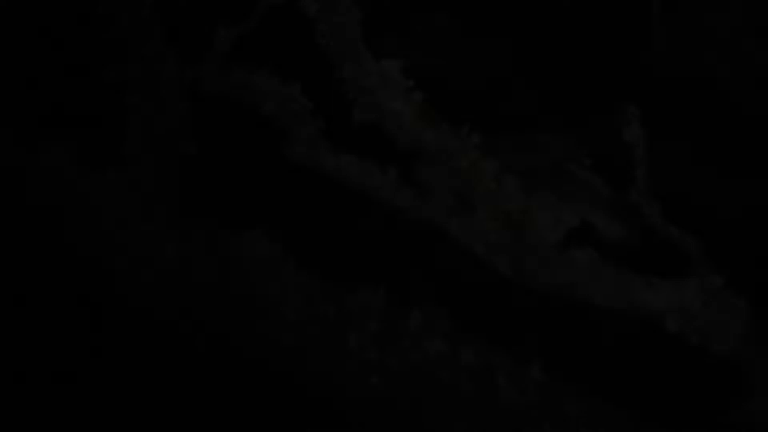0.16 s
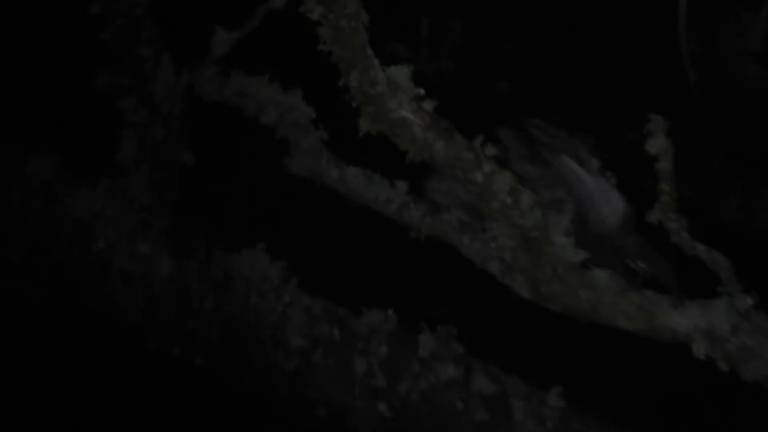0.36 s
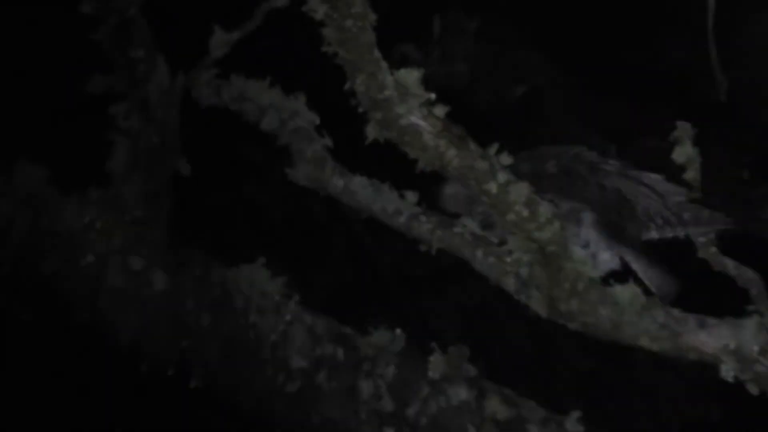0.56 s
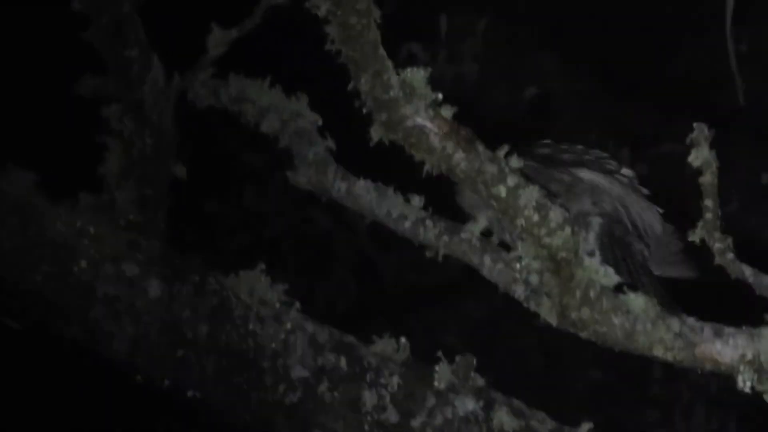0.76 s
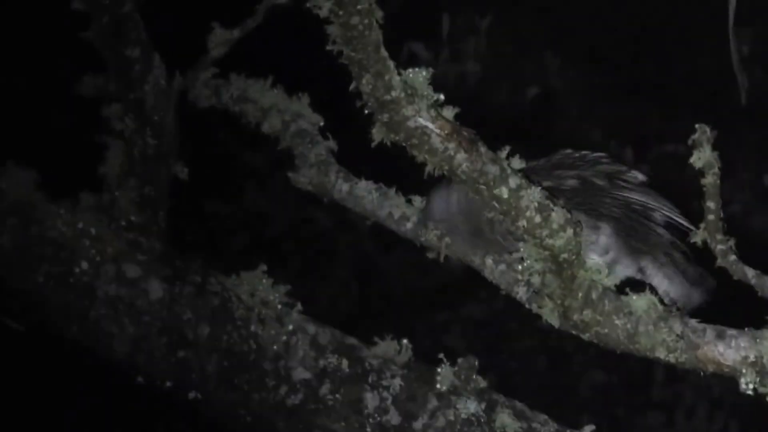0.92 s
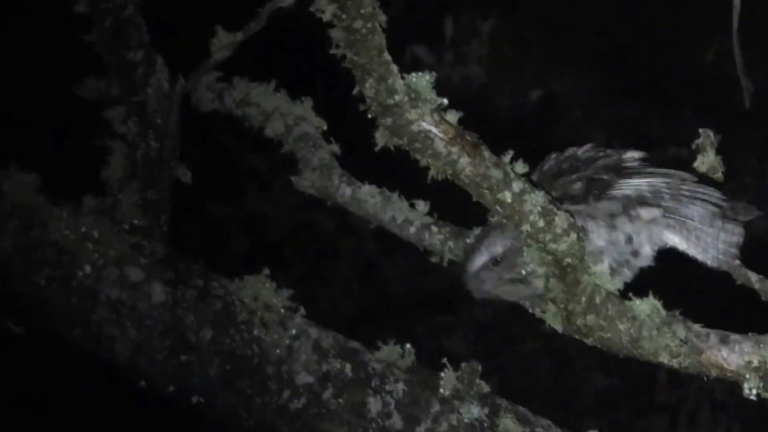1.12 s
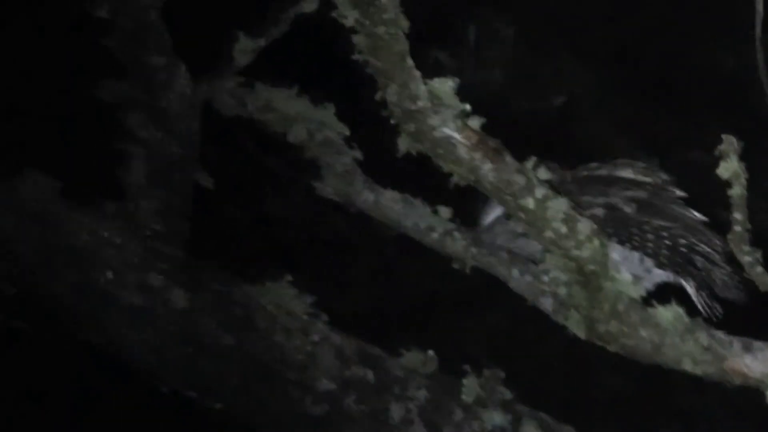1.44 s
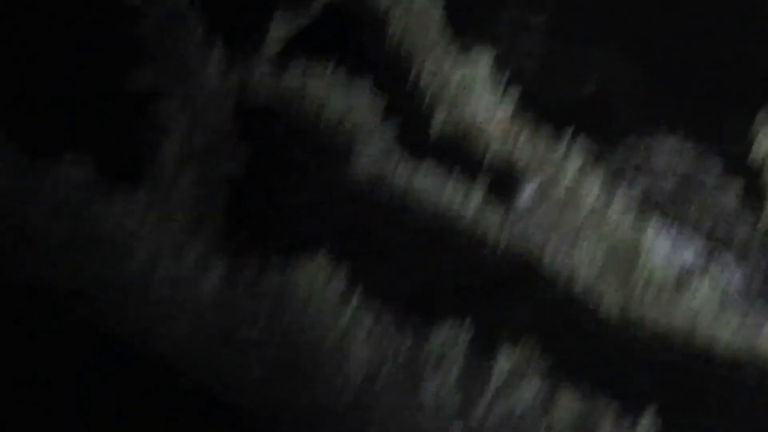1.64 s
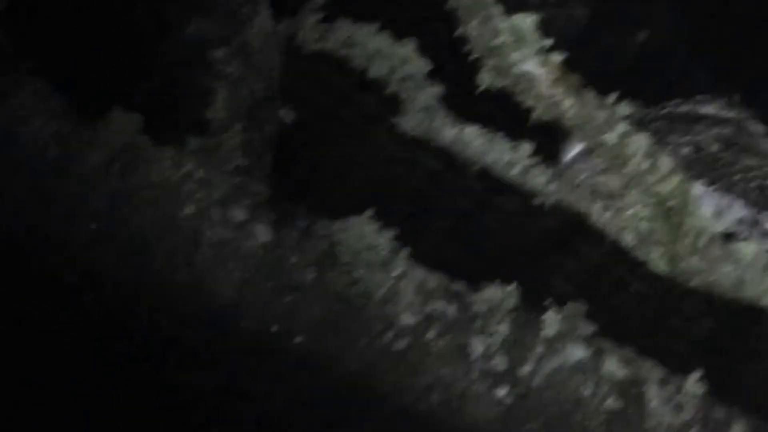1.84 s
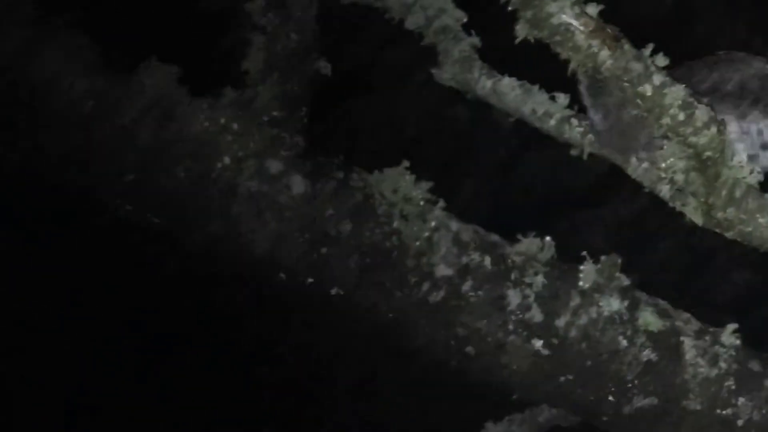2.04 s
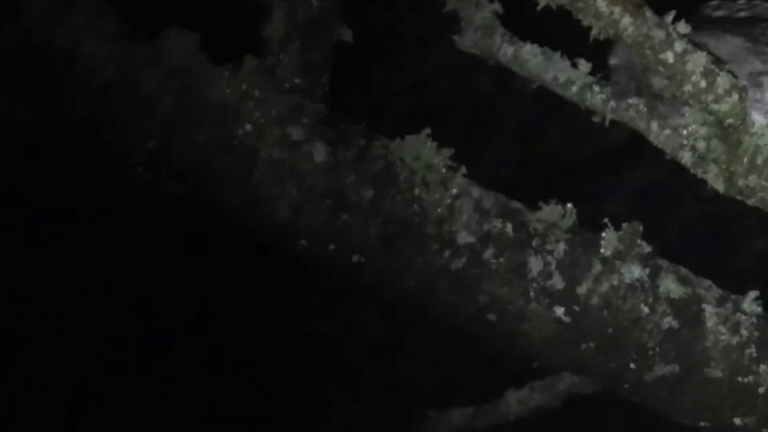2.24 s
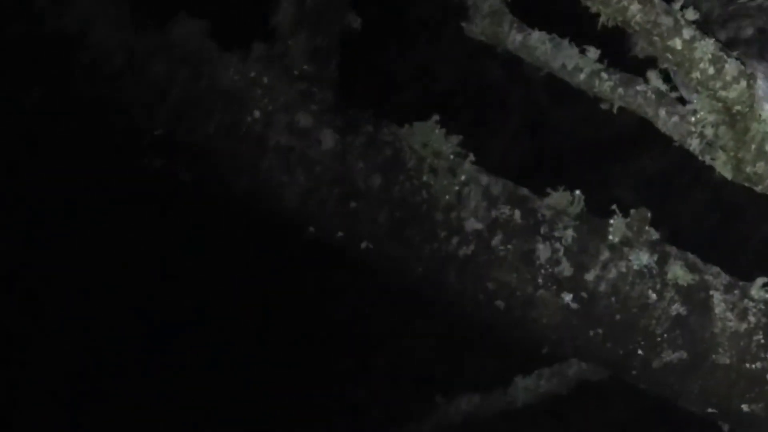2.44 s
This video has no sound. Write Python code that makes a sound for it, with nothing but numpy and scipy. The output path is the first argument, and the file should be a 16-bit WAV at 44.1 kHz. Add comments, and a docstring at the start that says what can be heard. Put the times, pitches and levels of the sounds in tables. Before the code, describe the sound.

A dense shrill frog chorus trills at night while an owl gives one low hoarse call.

```python
"""A dense distant chorus, probably frogs, shrills near 2.5 kHz in a wood at night; a few nearer trills stand out.
Trills are runs of ringing pulses; a lower chorus and other far callers are throbbing bands of noise.
A bird gives one low, falling, hoarse call, made of two unrelated tones and a rasp, ending in croaks.
Handling of a casing clicks, rubs and brushes now and then, as shaped noise. Filtered noise makes the soft hiss."""
import sys
import numpy as np
from scipy import signal
from scipy.fft import rfft, irfft
from scipy.io import wavfile
from scipy.ndimage import uniform_filter1d

SR = 44100
rng = np.random.default_rng(int(sys.argv[2]) if len(sys.argv) > 2 else 0)


def master_out(mix):
    """Clip the mix to full scale and print it as 16-bit PCM to the path in sys.argv[1]."""
    frames = np.transpose(np.atleast_2d(mix))
    ceiling = np.clip(frames, -1, 1)
    pcm = np.round(ceiling * 32767).astype(np.int16)
    wavfile.write(sys.argv[1], SR, pcm)


N = 113337
T = np.arange(N) / SR


def amp(db):
    """Decibels to gain."""
    return 10 ** (np.asarray(db) / 20)


def unit(x):
    """Scales to an rms of one."""
    return x / np.sqrt(np.mean(x ** 2) + 1e-20)


def level_out(x, window):
    """Evens out the loudness of a stereo sound over a window in samples, keeping the balance of its sides."""
    return x / np.sqrt(uniform_filter1d((x ** 2).mean(0), size=window) + 1e-6)


def read(points, hz):
    """Reads a spectrum on a log-frequency axis."""
    f, value = np.transpose(points)
    return np.interp(np.log(hz + 1), np.log(f + 1), value)


def add(mix, s, sound):
    """Mixes a stereo sound in at time s."""
    part = mix[:, max(round(s * SR), 0):][:, :sound.shape[1]]
    part += sound[:, :part.shape[1]]


def pan(db):
    """Gains of left and right for a level difference, left minus right."""
    return unit(amp(np.array([[db], [-db]]) / 2))


def swell(s, length):
    """A smooth rise and fall."""
    return np.sin(np.pi * np.clip((T - s) / length, 0, 1)) ** 2


def band(hz, width_hz, same):
    """Stereo noise in a resonance; same (0-1) is the likeness of the two sides."""
    f = np.fft.rfftfreq(N, 1 / SR)
    shared = np.sqrt(same) * rng.standard_normal(N)
    noise = shared + np.sqrt(1 - same) * rng.standard_normal((2, N))
    resonance = 1 / (1 + ((f - hz ** 2 / (f + 1)) / width_hz) ** 2)
    return unit(irfft(rfft(noise) * resonance, N))


def drift(hz):
    """Slow random wandering below about hz, rms one."""
    f = np.fft.rfftfreq(N, 1 / SR)
    return unit(irfft(rfft(rng.standard_normal(N)) * np.exp(-(f / hz) ** 2), N))


def woods(x, t60, wet_db):
    """Adds dense decaying echoes, different on each side, as scattered by trees; t60 in seconds."""
    t = T[:SR // 2]
    tail = rng.standard_normal((2, len(t))) * amp(-60 * t / t60) * (t > .003)
    tail /= np.linalg.norm(tail, axis=1, keepdims=True)
    echoes = signal.fftconvolve(x, tail, axes=1)[:, :N]
    return (x + amp(wet_db) * echoes) / np.hypot(1, amp(wet_db))


def trill(length, hz, pulses_per_s=105, ring_s=0.0025, jitter=.15, uneven_db=1.1, slip=0.57):
    """A run of uneven pulses, each ringing the caller's vocal sac with its own phase slip (radians)."""
    t = np.arange(0, length + .012, 1 / SR)  # room for the last ring
    draws = rng.standard_normal((40, 3))
    rate = pulses_per_s * rng.uniform(.7, 1.3)
    starts = np.cumsum(np.exp(jitter * draws[:, 0])) / rate
    out = np.zeros(len(t))
    for s, (_, size, turn) in zip(starts - starts[0], draws):
        if s < length:
            u = np.maximum(t - s, 0) / ring_s
            ring = u ** 2 * np.exp(-u * 1.34)
            out += amp(uneven_db * size) * ring * np.sin(2 * np.pi * hz * t + slip * turn)
    return unit(out * np.clip((t[-1] - t) / .003, 0, 1))


def frogs(count=190, spread=0.02412, sides_db=5, chorus_db=1.0):
    """Many overlapping trills blur into a chorus that swells and sinks; a few nearer ones stand clear."""
    # swell of the shrill chorus: t/s, level/dB (before chorus_db), pitch/Hz
    chorus = [(0.13, -27.5, 2479), (0.252, -23.5, 2472), (0.518, -25.5, 2535), (0.578, -22.5, 2569),
              (0.679, -23, 2529), (0.851, -21, 2473), (1.1, -20.5, 2523), (1.448, -19, 2484),
              (1.66, -22, 2476), (1.718, -20.5, 2462), (1.8, -21.5, 2493), (2.081, -18.5, 2509),
              (2.14, -25, 2457), (2.35, -25, 2416), (2.56, -25, 2453)]
    # nearer trills: start/s, length/s, level/dB (before echoes), pitch/Hz, left minus right/dB
    near_trills = [(.194, 0.047, -27.5, 2467, -2), (.41, 0.012, -26, 2550, -1.5),
                   (.534, 0.048, -20.5, 2570, -4), (0.704, 0.12, -22.5, 2495, -7),
                   (.94, 0.052, -18, 2511, -5), (1.135, 0.05, -19.5, 2466, -12),
                   (1.337, 0.044, -18.5, 2427, -6.5), (1.575, 0.05, -17.5, 2470, -2.5),
                   (1.657, 0.036, -16.5, 2410, -1.5), (1.849, 0.016, -19, 2460, -4),
                   (1.911, .025, -25.5, 2377, -3), (2.043, 0.026, -19.5, 2498, 1),
                   (2.219, 0.022, -17, 2388, -3), (2.261, 0.015, -24, 2410, -6),
                   (2.342, 0.15, -27, 2431, -14)]
    s, db, hz = np.transpose(chorus)
    far, near = np.zeros((2, 2, N))
    for k in range(count):
        start = (k + rng.random()) / count * T[-1]
        pitch, size, side = rng.standard_normal(3)
        caller_hz = np.interp(start, s, hz) * (1 + spread * pitch)
        voice = trill(rng.uniform(0.037, 0.13), caller_hz, ring_s=0.0011, slip=0.72)
        add(far, start, amp(2.5 * size) * pan(sides_db * side - 0.5) * voice)
    far = level_out(woods(far, t60=0.21, wet_db=-0.5), window=2500)
    far = far * amp(np.interp(T, s, db) + chorus_db) * pan(-0.94)
    for start, length, level_db, pitch, side_db in near_trills:
        add(near, start, amp(level_db) * pan(side_db) * trill(length, pitch))
    return far + woods(near, t60=1.0, wet_db=-3.5)


def far_choruses(throb_db=2.0, low_throb_db=1.0):
    """Distant callers blur into throbbing bands; the lower chorus comes in waves and wanders in pitch."""
    # waves of the lower chorus: t/s, pitch/Hz, level/dB (before the throb)
    low_waves = [(0.129, 841.6, -41), (.23, 865.6, -30.5), (.37, 843.2, -38), (0.459, 859.1, -31.5),
                 (.56, 859.6, -34), (0.781, 871.3, -30.5), (.84, 865.3, -38.5), (.99, 856.6, -34.5),
                 (1.421, 849.4, -38), (1.621, 854.4, -33.5), (1.68, 850, -40), (1.762, 835.3, -33.5),
                 (1.88, 851.7, -42), (2.059, 865, -38.5), (2.17, 839, -30.5), (2.24, 820.5, -42.5),
                 (2.39, 848.8, -34), (2.55, 848.3, -31)]
    # steady far bands: f/Hz, width/Hz, level/dB (before the throb)
    far_bands = [(1354.6, 72, -39), (432, 95, -51), (2937, 310, -37)]
    s, hz, db = np.transpose(low_waves)
    # shift a fixed noise band up and down to follow the pitch
    wander = np.exp(2j * np.pi * np.cumsum(np.interp(T, s, hz) - hz.mean()) / SR)
    low = signal.hilbert(band(hz.mean(), width_hz=75, same=0.84)) * wander
    loudness = np.sqrt(uniform_filter1d((abs(low) ** 2).mean(0), size=3000) + 1e-6)
    low = unit(low.real / loudness)
    out = low * amp(np.interp(T, s, db) + low_throb_db * drift(hz=25))
    for f, width, level in far_bands:
        out += band(f, width, same=0.89) * amp(level + throb_db * drift(hz=36))
    return out


def bird(waver=.028, upper_waver=0.044, shimmer_db=1.1):
    """A falling hoot; a second, unrelated tone and a rasp swell to make it hoarse, and it breaks up into croaks."""
    # the call: t/s, pitch/Hz, tone level/dB, upper tone/Hz, upper level/dB, rasp level/dB (before echoes)
    contour = [(1.05, 484, -49.5, 849.4, -65, -62), (1.074, 482, -35, 849.3, -57, -47.5),
               (1.103, 471.3, -46.5, 850, -62, -51.5), (1.123, 457, -31, 841.7, -38, -41.5),
               (1.14, 453, -22, 846.6, -31, -30.5), (1.156, 441.6, -30, 850.3, -28, -36),
               (1.176, 450, -22, 837, -28, -33), (1.199, 432, -30.5, 806, -29.5, -26),
               (1.215, 427, -28, 752.5, -20, -24), (1.255, 421.4, -27.5, 758.4, -19.5, -27),
               (1.29, 410.3, -25, 773, -20.5, -24.5), (1.316, 410, -19.5, 794, -24.5, -30),
               (1.331, 390, -42.5, 700, -28.5, -24), (1.346, 390, -57, 715, -48, -34),
               (1.39, 363, -66.5, 720, -66, -51.5)]
    # resonances of the rasp: f/Hz, width/Hz, relative level/dB
    throat = [(740, 160, 1), (1086, 140, -1), (430, 130, -7.5)]
    # croaks that end the call: start/s, length/s, relative level/dB, pitch/Hz
    croaks = [(1.334, 0.026, -30.5, 386), (1.353, 0.027, -26.5, 379), (1.374, 0.024, -32.5, 348)]
    overtone_db, croak_rasp_db = -14, -5.5
    s, hz, tone_db, upper_hz, upper_db, rasp_db = np.transpose(contour)

    def level(db):
        """Level along the call in dB, inaudible outside it."""
        return np.interp(T, s, db, -120, -120)

    def tone(pitch, db, unsteady):
        """One wavering voice of the syrinx."""
        turns = np.cumsum(np.interp(T, s, pitch) * (1 + unsteady * drift(hz=119))) / SR
        return unit(np.sin(2 * np.pi * turns)) * amp(level(db) + shimmer_db * drift(hz=127.6))

    rasp = level_out(sum(amp(db) * band(f, width, same=0.92) for f, width, db in throat), window=700)
    hoarse = tone(upper_hz, upper_db, upper_waver) + rasp * amp(level(rasp_db))
    call = pan(-2) * tone(hz, tone_db, waver) + pan(1.5) * hoarse
    for start, length, db, pitch in croaks:
        turn = 2 * np.pi * pitch * T
        croak = unit(np.sin(turn) + amp(overtone_db) * np.sin(2 * turn)) + amp(croak_rasp_db) * rasp
        call += amp(db) * swell(start, length) * croak
    return woods(call, t60=0.4, wet_db=-12)


def handling():
    """Short scraping clicks and crackly rubs, coloured by a casing, and one dull brush of the hand."""
    # clicks: start/s, relative level/dB, time scale/s (peak at half of it), centre of the scrape/Hz
    clicks = [(0.169, -23.5, 0.0053, 4770), (0.202, -22, 0.0017, 5970), (0.703, -27.5, 0.0065, 5000),
              (0.995, -34.5, 0.01, 4200), (1.141, -32, 0.0023, 9500), (1.282, -29, 0.0013, 9700),
              (1.383, -27.5, 0.013, 4800), (1.415, -28, 0.0057, 4510), (1.599, -39.5, 0.002, 8300),
              (1.912, -31.5, 0.0036, 5367), (2.05, -21.5, 0.00071, 8300), (2.5248, -5.5, 0.0018, 5300)]
    # finger rubs: start/s, length/s, relative level/dB
    rubs = [(0.143, 0.12, -39), (1.365, .07, -51), (2.504, 0.042, -31.5)]
    # colour of the casing: f/Hz, gain/dB
    casing = [(80, -51.5), (300, -25), (2000, -2.5), (3500, 1), (4700, -0.5), (6600, -0.5), (8200, -4),
              (10000, -15), (12500, -30.5)]
    out = np.zeros((2, N))
    for s, db, length, hz in clicks:
        u = T[:4000] / length
        scrape = band(hz, width_hz=2400, same=0.46)[:, :len(u)]
        add(out, s, amp(db) * u * np.exp(-u ** 2 * 2) * scrape * 2)
    grain = rng.standard_normal((2, N)) * unit(amp(3.8 * drift(hz=250)))  # crackly noise
    for s, length, db in rubs:
        out += amp(db) * swell(s, length) * grain * 2
    out = irfft(rfft(out) * amp(read(casing, np.fft.rfftfreq(N, 1 / SR))), N)
    brush = amp(-24) * swell(2, length=0.078) * band(1700, width_hz=1360, same=0.65)
    return woods(out * pan(-5.5), t60=0.043, wet_db=-7.5) + brush


def air(hiss_db=-25.5, flutter_db=1.97, flutter_top_hz=3600, murmur_hz=905):
    """The soft hiss of the wood and its farthest insects, fluttering below its top, over a low murmur."""
    # colour of the night air: f/Hz, relative level/dB (per Hz)
    colour = [(30, -58.5), (60, -57), (95, -47.5), (125, -48), (160, -36.5), (220, -33), (260, -36),
              (390, -28), (600, -26), (1000, -26), (1600, -22.5), (2150, -18.5), (2700, -17.5),
              (3300, -30.5), (4000, -33.5), (5000, -37.5), (6200, -40), (7300, -47.5), (8300, -65.5),
              (10000, -73.5), (13000, -92)]
    # likeness of the two sides: f/Hz, correlation (0-1)
    likeness = [(100, 0.8), (400, 0.25), (850, 0.75), (1400, 0.42), (2500, 0.5), (4000, 0.01), (7000, 0)]
    # balance of the sides: f/Hz, left minus right/dB
    lean = [(100, -2), (400, -1.5), (850, 1), (1500, -2), (2500, -0.5), (5000, -3)]
    # coming and going of the murmur: t/s, gain/dB
    murmur = [(.15, 1), (.3, 5), (.7, 1), (.8, -4.5), (1.05, 3.5), (1.3, 3.5), (1.55, 2.5), (1.9, 0),
              (2.1, -2.5), (2.4, -3), (2.55, 3)]
    f = np.fft.rfftfreq(N, 1 / SR)
    a, b = rfft(rng.standard_normal((2, N)))
    same = np.clip(read(likeness, f), -1, 1)
    sides = np.array([a, same * a + np.sqrt(1 - same ** 2) * b])
    sides = sides * amp(np.array([[.5], [-.5]]) * read(lean, f))
    hiss = unit(irfft(sides * amp(read(colour, f)), N))
    low = irfft(rfft(hiss) * np.exp(-(f / murmur_hz) ** 2), N)
    steady = irfft(rfft(hiss) / (1 + (flutter_top_hz / (f + 1)) ** 10), N)  # the treble
    body = hiss - steady - low + low * amp(np.interp(T, *np.transpose(murmur)))
    return amp(hiss_db) * (steady + body * amp(flutter_db * drift(hz=20.5)))


def scene():
    """All the sources together."""
    return frogs() + far_choruses() + bird() + handling() + air()


def record(dry, open_s=0.1142, edge_hz=13600):
    """Silence until the sound cuts in at open_s; then a steep low-pass limits the band."""
    opened = dry * np.clip((T - open_s) / .001, 0, 1)
    low_pass = signal.firwin(511, edge_hz, window=("kaiser", 9), fs=SR)
    return signal.oaconvolve(opened, low_pass[None], "same")


dry = scene()
out = record(dry)
master_out(out)
```